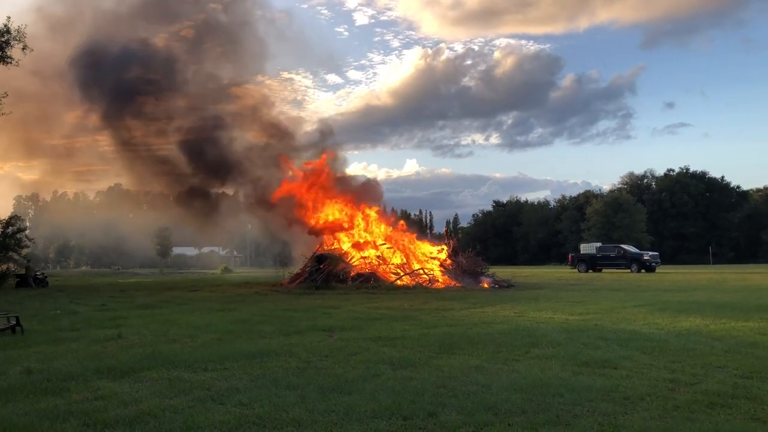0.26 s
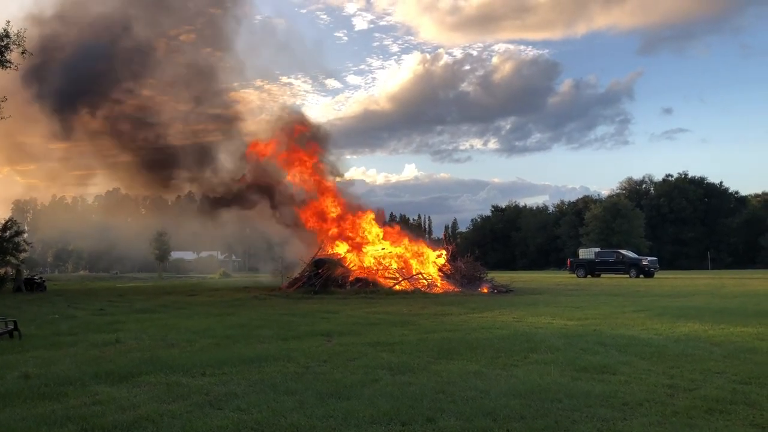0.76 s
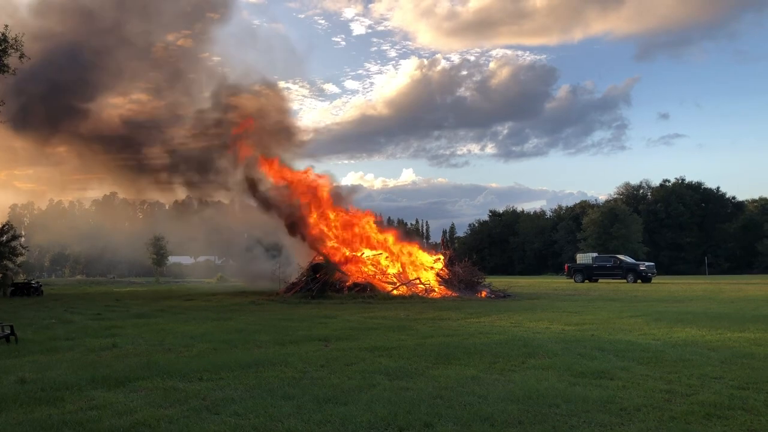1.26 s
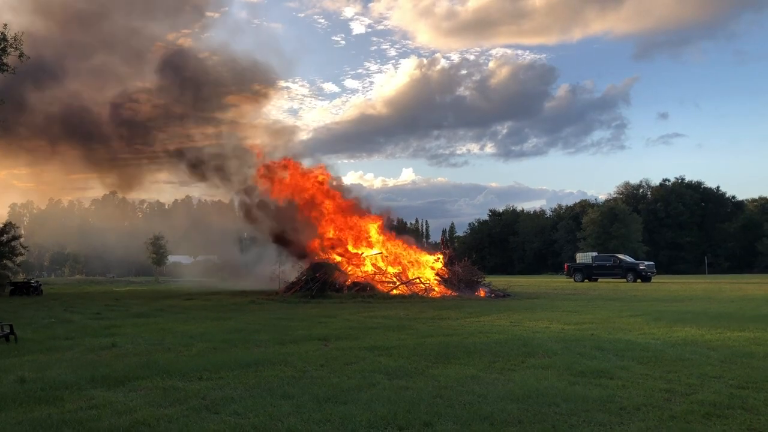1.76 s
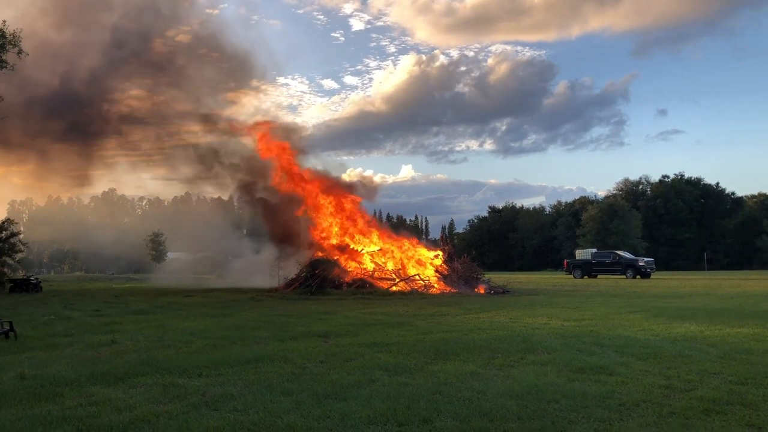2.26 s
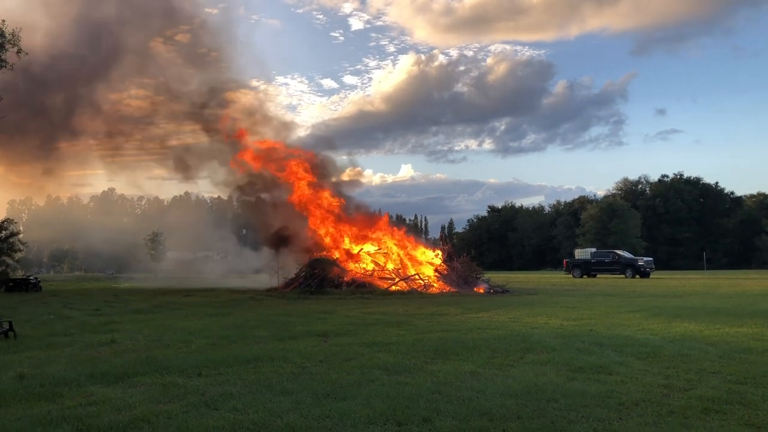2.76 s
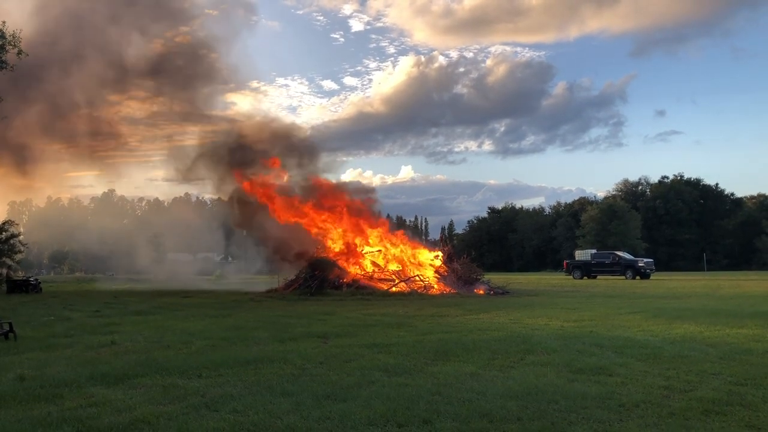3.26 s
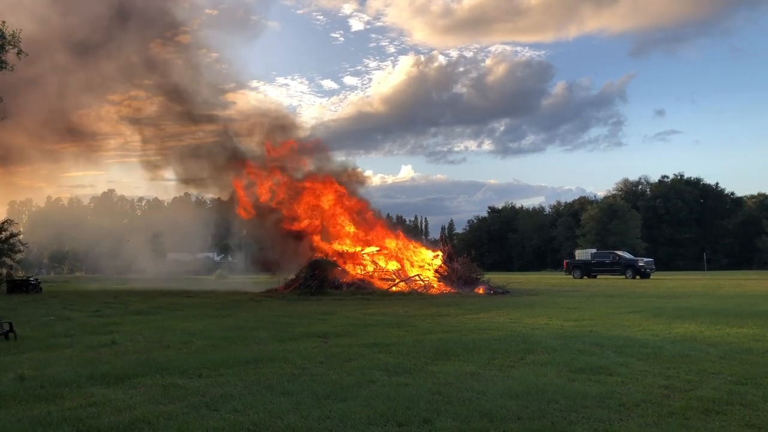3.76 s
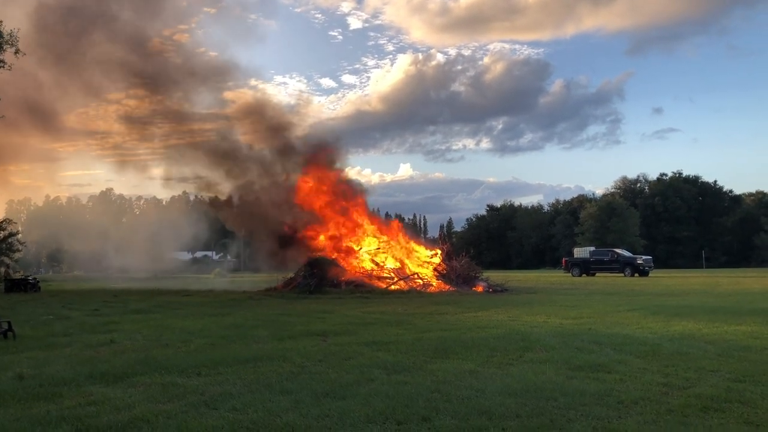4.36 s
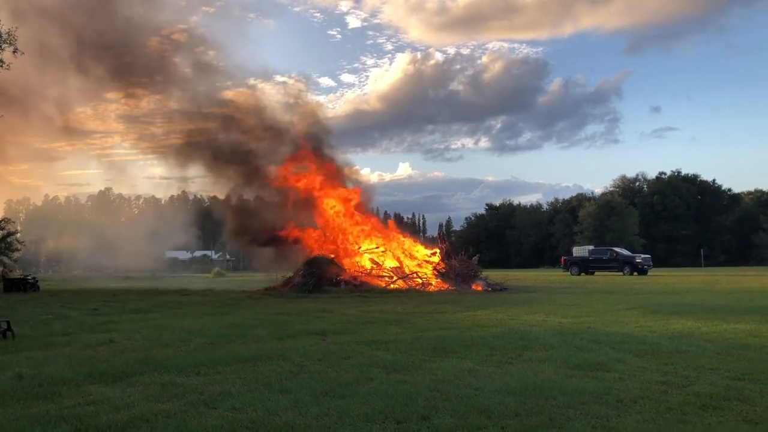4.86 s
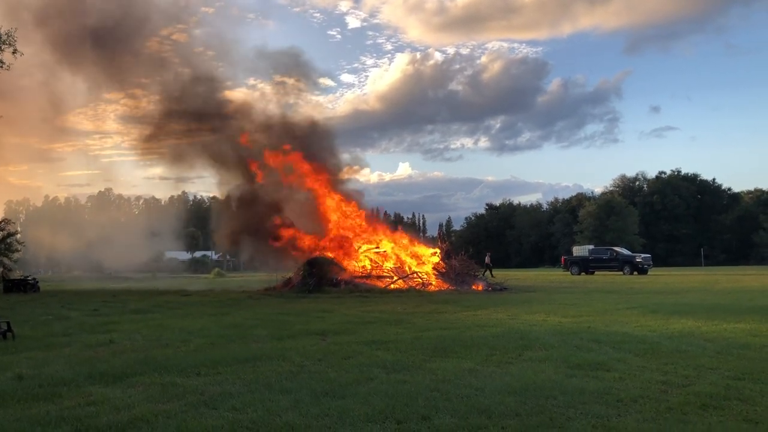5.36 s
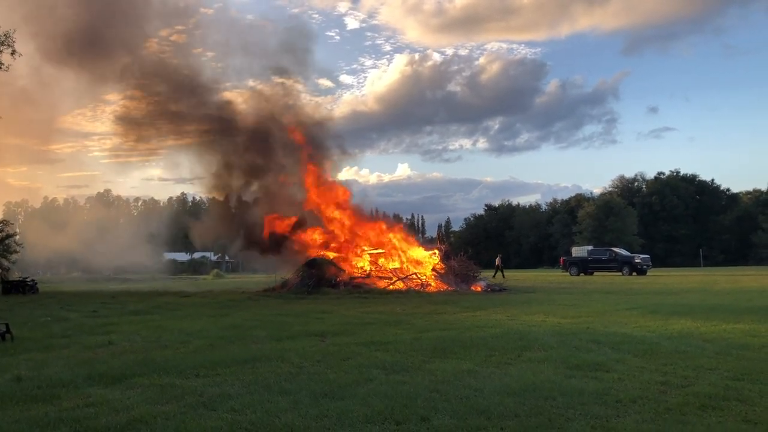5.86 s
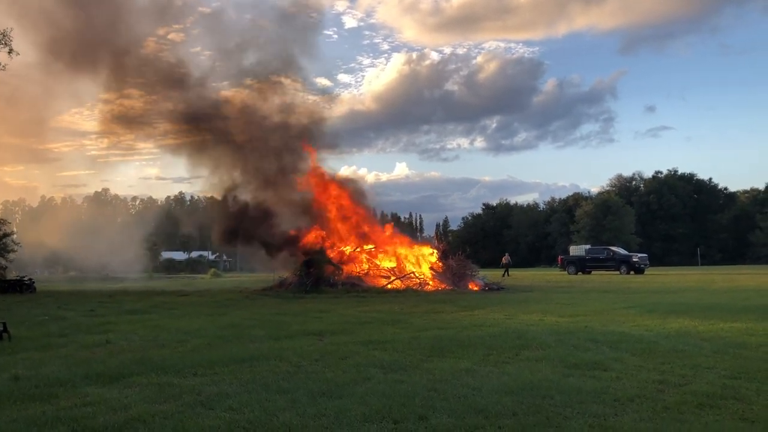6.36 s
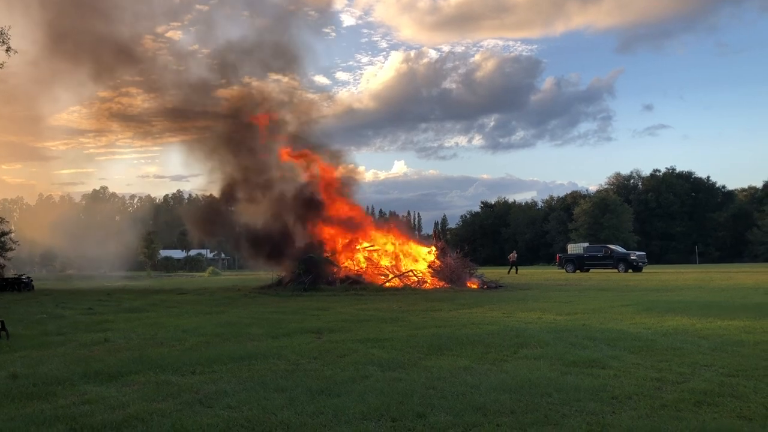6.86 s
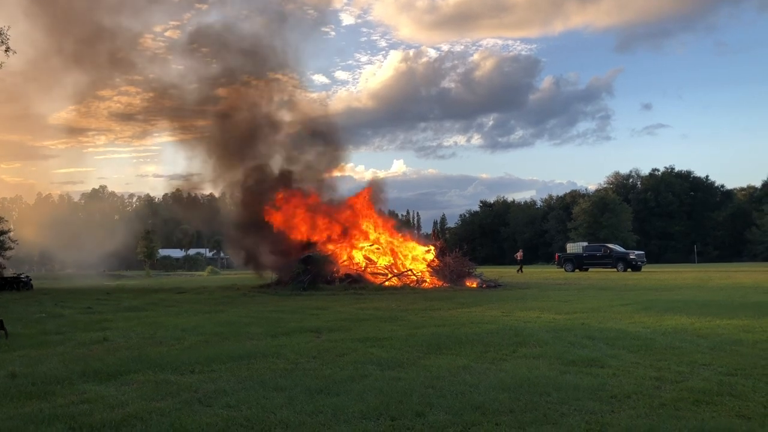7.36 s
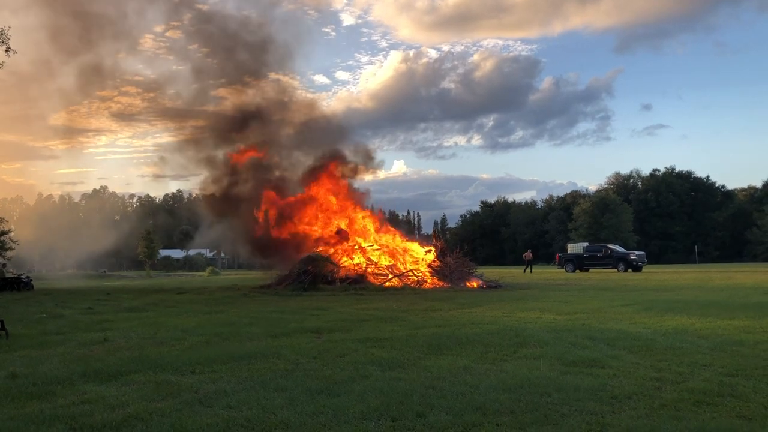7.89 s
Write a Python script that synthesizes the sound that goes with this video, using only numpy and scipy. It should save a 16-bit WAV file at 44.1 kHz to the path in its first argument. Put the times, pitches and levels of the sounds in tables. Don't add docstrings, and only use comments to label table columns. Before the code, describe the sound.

Continuous outdoor fire crackle: countless tiny ticks, medium dry snaps and occasional loud cracks, some dull and woody, others bright. Soft turbulent flame roar and low churning lie underneath, with the uneven bass throb of an idling truck, generator hum and a faint steady whine. A distant horn chord disappears at the start; far traffic drones, rising briefly around six seconds as a lorry passes. A loud crack comes at the very end. Phone microphone, open air, no close sounds.

```python
import sys
import numpy as np
from scipy import signal
from scipy.fft import rfft, irfft, next_fast_len
from scipy.io import wavfile
from scipy.ndimage import uniform_filter1d

SR = 44100
rng = np.random.default_rng(int(sys.argv[2]) if len(sys.argv) > 2 else 0)


def level_to_linear(level):
    exponent = np.asarray(level, float) / 20
    return 10 ** exponent


def store_pcm(level_fs):
    pcm = np.round(np.clip(level_fs, -1, 1) * 32767).astype(np.int16)
    wavfile.write(sys.argv[1], SR, np.atleast_2d(pcm).T)


N = 358533
TIME_S = np.arange(N) / SR

# start_s, draught_db, dry_fuel_db
BLAZE = [(0.0, -47, -49), (0.2, -45, -53.5), (0.93, -45, -56), (1.31, -48, -53), (1.83, -46.5, -56.5),
         (2.15, -50.5, -53.5), (2.42, -47, -56.5), (3.51, -48.5, -53), (4.2, -48, -57), (5.25, -49.5, -57),
         (6.0, -47.5, -53.5), (6.57, -51, -57.5), (6.77, -49, -56.5), (6.9, -45.5, -55), (7.27, -52.5, -56),
         (7.81, -45.5, -54.5), (8.13, -47.5, -59)]
# freq_hz, density_db_per_hz
ROAR_SPECTRUM = [(120, -4), (200, -3.5), (399, -8), (497, -12), (842, -8), (974, -12), (1400, -8),
                 (2060, -14.5), (2250, -15.5), (4920, -15), (6710, -22), (12900, -25), (15500, -28)]
# centre_hz, width_hz, level_db
CHURN = [
    (56.8, 25.5, -49.5),
    (95.7, 37, -47.5),
    (163.7, 26.4, -53),
]
# multiple, level_db
SHAFT_HUM = [(2, -51), (4, -58.5), (5, -47), (6, -57.5), (8, -65), (9, -61), (10, -66), (20, -71),
             (28, -67)]
# start_s, level_db
WHINE_LEVEL = [(0.0, -76), (0.12, -55), (0.64, -56.5), (0.74, -72), (0.86, -55), (1.54, -64), (2.2, -58.5),
               (2.95, -57.5), (3.2, -58.5), (3.96, -56), (4.3, -74), (4.6, -65), (5.55, -58), (6.15, -58.5),
               (6.9, -60), (7.45, -63), (7.8, -59), (8.13, -62)]
# start_s, turns_done, level_db
IDLE = [
    (0.0, 0.2, -42),
    (2.0, 21.82, -41.3),
    (3.5, 38.02, -42),
    (4.0, 43.33, -40.8),
    (5.2, 56.43, -40.2),
    (6.0, 64.94, -40.4),
    (7.0, 75.73, -41.6),
    (8.13, 88.28, -40.2),
]
# centre_hz, width_hz, level_db
EXHAUST_MODES = [
    (53, 7.1, -21),
    (91.7, 25.5, 2.5),
    (102.4, 9, 9),
    (153, 76, -16.5),
]
# freq_hz, level_db
HORN_CHORD = [
    (372, -78),
    (416, -56),
    (517, -61),
    (619, -68),
]
# freq_hz, gain_db
POP_PATH = [(1500, 6), (3000, 1), (5100, 0.5), (6800, -4), (9700, -6), (13000, -3), (15500, -4.5)]
# start_s, level_db
BARK_TICKS = [(.0074, -41), (.1564, -43), (.1906, -41), (.704, -41), (.771, -44), (1.104, -40),
              (1.3804, -46), (1.5125, -41), (1.609, -41), (3.4654, -45), (4.1077, -39), (5.1734, -38),
              (5.4165, -44), (6.204, -40), (6.905, -40.5), (7.0044, -40), (7.1074, -43), (7.9312, -38)]
# start_s, level_db
NEEDLE_TICKS = [(.2154, -44), (.922, -43), (1.813, -39), (1.944, -43), (2.437, -45), (3.3884, -44),
                (3.5564, -43), (4.312, -48), (4.547, -45), (4.803, -43), (4.957, -39), (5.484, -39),
                (6.171, -48), (6.334, -48), (6.587, -48), (7.47, -46), (7.849, -46), (8.031, -35)]
# start_s, level_db, ring_hz
DAMP_SNAPS = [(0.136, -39, 4690), (0.255, -33, 3490), (0.304, -37, 5210), (0.4066, -34.5, 1520),
              (0.9296, -38, 1460), (.9737, -36.5, 5070), (1.081, -38, 4880), (1.154, -38, 1760),
              (1.3479, -36.5, 2670), (1.469, -36, 1453), (1.634, -42, 4620), (2.213, -36.5, 3446),
              (2.6412, -32.5, 3800), (2.7675, -37.5, 3020), (3.415, -37.5, 2715), (3.9763, -34.5, 2590),
              (4.023, -37, 4610), (4.1236, -35, 1700), (4.8718, -39.5, 4690), (5.269, -36, 4390),
              (5.3126, -38, 2580), (5.3736, -38, 3360), (5.454, -34.5, 4780), (6.54, -39.5, 3734),
              (6.747, -38, 3370), (6.843, -39, 2115), (7.0823, -40, 3620), (7.524, -38.5, 3620),
              (7.64, -36, 6040), (7.7741, -43, 3330)]
# start_s, level_db, ring_hz
DRY_SNAPS = [(0.198, -32.5, 2770), (.4331, -38, 4260), (0.8382, -36, 3500), (0.9823, -36.5, 4390),
             (1.183, -34.5, 4880), (1.438, -36.5, 4950), (2.0303, -38.5, 4010), (2.14, -41, 6290),
             (2.199, -34, 4740), (2.245, -38.5, 5340), (2.609, -37, 5380), (2.748, -34.5, 4000),
             (2.91, -42, 6240), (3.026, -38, 3880), (3.306, -41, 4350), (3.3786, -40, 5380),
             (3.582, -33, 4480), (3.595, -36, 4598), (4.771, -36, 4480), (5.1048, -40, 3500),
             (5.536, -39.5, 2973), (5.65, -34, 5570), (5.8305, -36, 2020), (5.970, -38, 4060),
             (6.0514, -42, 5470), (7.0692, -39, 5803), (7.242, -41, 4030), (7.363, -38, 5080),
             (2.916, -43, 7500), (3.096, -46, 5000), (0.228, -44, 6000), (1.899, -37, 3400),
             (7.02, -44, 6500)]
# start_s, level_db, ring_hz, treble_db
FAINT_SNAPS = [(0.577, -41, 2630, -12), (1.302, -40, 4420, 2), (1.484, -40, 5530, -2),
               (1.5552, -39, 3620, -18), (1.8327, -43, 1673, -18), (1.981, -38.5, 5000, 3),
               (2.083, -39.5, 4450, -11), (2.367, -39.5, 3080, -21), (2.9661, -41, 5010, 9),
               (3.2907, -37.5, 4870, 2), (3.8347, -40, 5030, 1), (3.929, -40, 4260, -9),
               (4.199, -38, 4520, -1), (4.2777, -38, 3960, -7), (4.335, -38.5, 4970, -22),
               (4.519, -40, 4480, -4), (4.5689, -42, 4800, 0), (4.6098, -40.5, 5470, -7),
               (4.6758, -42, 4336, 3), (5.07, -40, 4200, 8), (5.2225, -40.5, 4380, -19),
               (5.3616, -39, 3700, 14), (5.5484, -40.5, 3570, -16), (5.9172, -41, 5450, 11),
               (6.3747, -39.5, 3520, -21), (6.6, -42, 3750, -25), (6.9197, -37, 3300, -14),
               (7.0467, -40.5, 3444, -19), (7.427, -41.5, 3430, -20), (7.497, -39, 5730, -7),
               (0.8629, -47, 1850.0, 1), (0.9565, -37, 1590.0, -21), (1.1557, -40, 1640.0, -20),
               (1.1997, -43, 1640.0, 7), (1.6257, -41, 2540.0, -12), (1.6655, -41, 1810.0, -1),
               (1.833, -44, 1420.0, -11), (1.9161, -34, 4650.0, -14), (2.009, -43, 6890.0, 3),
               (2.0627, -49, 5250.0, 8), (2.1485, -44, 3750.0, 10), (2.1795, -41, 5600.0, 12),
               (2.223, -37, 3270.0, 1), (2.2845, -37, 6030.0, 3), (2.3156, -40, 1640.0, 3),
               (2.7911, -42, 3616, -18), (2.85, -43, 5040.0, -7), (2.9294, -47, 2450.0, -5),
               (3.019, -37, 4780.0, -8), (3.188, -45, 4480.0, 2), (3.4097, -43, 2200.0, -12),
               (3.5643, -48, 1592, -13), (3.706, -41, 1590.0, 9), (3.8477, -46, 4786, -11),
               (4.0035, -40, 2370.0, -11), (4.3726, -43, 5127, 7), (4.4982, -42, 6680.0, 9),
               (4.7207, -43, 3660.0, -16), (4.8978, -41.5, 5640.0, -4), (5.1047, -42, 1550.0, 9),
               (5.2606, -45, 3750.0, 0), (5.3463, -43, 2800.0, 7), (5.672, -32, 4150, -8),
               (5.6436, -39, 4910.0, 1), (5.8262, -38, 1120.0, 8), (6.093, -40, 3750.0, 2),
               (6.2303, -42, 2710.0, -13), (6.831, -45, 4790, -16), (7.0962, -41, 6956, -6),
               (7.241, -41, 3570.0, -2), (7.317, -45, 5300.0, -9), (7.3936, -47, 3230.0, -12),
               (7.4535, -39, 1640.0, -18), (7.676, -41, 2280.0, -14), (7.7832, -42, 1381, 4)]
# start_s, level_db, low_hz, treble_db, scatter_db
STICK_POPS = [(0.2647, -15, 2480, -8, -25), (0.3384, -24.5, 2300, -4, -22), (0.6395, -23.5, 3760, -6, -20),
              (.6949, -34.5, 2627, 5, -16), (.8989, -32.5, 2070, -23, -17), (1.5245, -29, 1150, -6, -13),
              (1.6421, -29, 2262, -5, -11.5), (2.404, -29, 1900, -4, -14), (2.652, -29, 2500, -12, -12),
              (2.995, -27.5, 2210, -17, -28), (3.2064, -35.5, 1409, -28, -11),
              (3.5857, -22, 2940, -30, -20.5), (4.1635, -29, 3190, -15, -21),
              (4.4419, -34.5, 3790, -2, -11), (4.462, -30.5, 1680, -14, -24),
              (4.6336, -27.5, 960, -16, -30), (5.716, -32.5, 1770, -1, -18),
              (5.8454, -30, 3700, -13, -18.5), (6.0066, -29.5, 2040, -4, -15),
              (6.13, -33.5, 1410, -19, -30), (6.4057, -28.5, 2540, -14, -17.5),
              (6.9436, -27.5, 2840, -13, -18), (8.047, -32, 1858, 5, -17), (8.0601, -30, 1680, 0, -21)]
# start_s, level_db, low_hz, high_hz, treble_db
BRANCH_POPS = [(.372, -28, 1850, 4700, -39), (0.5018, -25.5, 1310, 4460, -44),
               (0.5494, -29.5, 1140, 4780, -9), (0.9538, -31.5, 930, 2240, -32),
               (1.5288, -39, 3020, 4630, -25), (1.9122, -32, 1640, 6930, -11),
               (2.3792, -35, 1284, 3890, -28), (2.5745, -23, 1140, 3903, -9),
               (3.1552, -31.5, 1640, 4600, -9), (3.698, -35, 1210, 6660, -19),
               (3.8107, -29, 1490, 5200, -35), (4.9512, -33.5, 2413, 4940, -8),
               (5.389, -27, 1664, 3560, -8), (5.7769, -34, 2200, 6800, -9), (6.257, -37, 1770, 5270, -8),
               (6.4797, -32.5, 3100, 7500, -3), (7.2543, -35.5, 2590, 6760, -22),
               (7.3225, -35, 1120, 3740, -12), (7.597, -38, 1341, 5000, -21),
               (7.6497, -32, 1565, 5280, -10), (7.792, -28.5, 1270, 4430, -16),
               (7.878, -34, 3454, 6760, -18)]
# start_s, level_db, low_hz, treble_db, scatter_db
TWIG_POPS = [(1.0548, -31, 3480, 4, -11.5), (1.8832, -28.5, 2760, -13, -22), (1.8935, -34, 3900, 1, -13),
             (2.2919, -29, 3660, 4, -17), (3.337, -35, 3490, 3, -9), (3.8916, -35, 3490, -4, -11),
             (4.1525, -24.5, 3920, 0, -19.5), (4.483, -37.5, 3957, -7, -10), (4.845, -30, 3990, 7, -21),
             (5.1625, -26, 2327, 7, -20), (5.3244, -27, 3490, -3, -19.5), (5.6257, -24, 4084, -6, -21),
             (5.6632, -25, 4610, -18, -21), (5.7441, -19.5, 4300, 1, -27), (6.1047, -34, 2314, 2, -22),
             (6.1366, -29.5, 4780, 2, -14), (6.441, -33, 1890, -2, -21), (6.8164, -35.5, 2580, -5, -16),
             (6.9646, -36, 3400, 2, -14), (7.74, -32.5, 2236, -3, -26), (7.864, -24.5, 3676, 9, -32),
             (7.938, -24.5, 3380, -6, -22), (7.9792, -32, 3560, -14, -23), (8.071, -15, 2340, 2, -24)]
# start_s, low_ring_hz, low_lift_db, high_ring_hz, high_lift_db
SPLINTER_RINGS = [(0.2647, 2160, 5, 4000, 7), (0.3384, 2100, 8, 5040, 6), (0.372, 2200, 14, 5000, 6),
                  (0.5022, 1470, 12, 3790, 5), (0.5494, 1250, 9.5, 4290, 7), (0.6395, 3000, 6, 4500, 10),
                  (0.9533, 1290, 3, 4410, 20), (1.0548, 4910, 3, 5840, 3), (1.5245, 1490, 5, 3560, 20),
                  (1.6421, 2520, 4, 3250, 2), (1.8832, 5470, 3, 7200, 6), (2.2919, 5530, -1, 8160, -5),
                  (2.404, 3540, 13, 5490, 9), (2.5742, 2260, 16, 3640, 12), (2.652, 4030, 2, 5400, 12),
                  (2.995, 2370, 11, 5000, 7.5), (3.1543, 2822, 7, 3490, 6), (3.5857, 4430, 7.5, 5880, -3),
                  (3.8106, 1530, 8, 4590, 10), (4.1525, 5340, 4, 9000, 3), (4.462, 1310, 3, 2260, 7),
                  (4.6336, 1100, 9, 4420, 12.5), (4.845, 5905, 3, 8500, 3), (5.1625, 2280, 11.5, 5140, 11),
                  (5.3244, 3680, 2, 5470, 2), (5.389, 2160, 9, 4370, 3), (5.6257, 4810, 1, 8200, 3),
                  (5.6632, 4917, 1, 5555, 2), (5.7441, 5530, 6, 7710, -4), (5.8454, 4740, 4, 5600, 0),
                  (6.0066, 3470, 10, 5430, -12), (6.1366, 5540, 6, 7970, 6), (6.4057, 2650, 7, 5040, 6),
                  (6.9436, 3380, 2, 5570, 4), (7.6495, 3600, 9, 5168, 5), (7.792, 1530, -1, 3120, 7),
                  (7.864, 4310, 9, 7970, 1), (7.938, 1398, 17.5, 5310, 8.5), (8.047, 3603, 10, 4800, 13),
                  (8.071, 2950, 8, 7800, 8)]
# start_s, ring_hz, lift_db
BODY_KNOCKS = [(.2647, 8600, 3), (.3384, 8150, 5), (.9533, 895, 11), (1.5245, 1000, 6), (2.404, 1590, 8),
               (2.5742, 1090, 10.5), (2.5742, 800, 12), (3.5857, 1670, 10), (4.1525, 6760, 3),
               (4.6336, 805, 5), (5.6257, 6730, 5), (7.938, 10300, 3), (8.071, 5490, 4), (8.071, 4640, 5),
               (8.071, 1560, 9), (8.071, 10700, 5.5), (8.071, 15020, 0), (.2647, 12500, 3),
               (.6395, 11900, 7), (.5494, 8160, 8), (5.389, 1700, 5)]


def level(x, db):
    return x * level_to_linear(db) / np.sqrt(np.mean(x ** 2))


def curves(table):
    start_s, *columns = np.transpose(table)
    return [np.interp(TIME_S, start_s, column) for column in columns]


def walk(rate_hz):
    hold = int(SR / rate_hz)
    steps = np.repeat(rng.standard_normal(N // hold + 1), hold)
    return 1.09 * uniform_filter1d(uniform_filter1d(steps, hold), hold)[:N]


def band(x, hz, width_hz):
    return signal.lfilter(*signal.iirpeak(hz, hz / width_hz, fs=SR), x)


def rumble(hz, width_hz):
    return band(band(rng.standard_normal(N), hz, width_hz), hz, width_hz)


def flames():
    roar_db, hiss_db = curves(BLAZE)
    hz_points, db_points = np.transpose(ROAR_SPECTRUM)
    size = next_fast_len(N)
    f = np.fft.rfftfreq(size, 1 / SR) + 1
    colour = level_to_linear(np.interp(np.log(f), np.log(hz_points), db_points))
    colour = colour / np.sqrt(np.sum(colour[(f > 500) & (f < 6000)] ** 2) / len(f))
    swell_db = 0.5 * roar_db + 0.5 * roar_db.mean()
    sizzle_db = hiss_db - hiss_db.mean() + roar_db.mean()
    flicker = walk(70)
    out = 0
    for octave in np.arange(7, 14.5, 0.5):
        share = np.cos(np.pi * np.clip(np.log2(f) - octave, -0.5, 0.5))
        noise = irfft(rfft(rng.standard_normal(N), size) * colour * share)[:N]
        bright = np.clip((octave - 10.5) / 3.2, 0, 1)
        treble_db = bright * (sizzle_db - swell_db + 2.0 * flicker)
        out = out + noise * level_to_linear(swell_db + treble_db + 1.6 * walk(12) - 2.0)
    return out + sum(level(rumble(hz, width_hz), db) for hz, width_hz, db in CHURN)


def generator():
    teeth, whine_hz, creep_hz_per_s = 64, 1927, 1.5
    whine_db, = curves(WHINE_LEVEL)
    shaft_hz = (whine_hz + creep_hz_per_s * TIME_S + 3.6 * walk(4)) / teeth
    turn = 2 * np.pi * np.cumsum(shaft_hz) / SR
    hum = sum(level_to_linear(db + 1.6 * walk(9)) * np.sin(int(round(k)) * turn + 7 * rng.random())
              for k, db in SHAFT_HUM)
    whine = level_to_linear(whine_db - 1.5 + 2 * walk(20)) * np.sin(teeth * turn + 0.7 * walk(30))
    return np.sqrt(2) * (hum + whine)


def truck(rough=0.033, scatter_db=0.0):
    turns, db = curves(IDLE)
    firing = (4 * (turns + 0.2)).astype(int)
    at = np.flatnonzero(np.diff(firing))
    jitter, uneven = rng.standard_normal((len(at), 2)).T
    pattern_db = np.array([14.0, -29, -13, -32])[firing[at + 1] % 4]
    where = np.clip(at + rough * SR / 43 * jitter, 0, N - 1).astype(int)
    pulses = np.bincount(where, level_to_linear(pattern_db + scatter_db * uneven), N)
    pipe = sum(level_to_linear(gain_db) * band(band(pulses, hz, width_hz), hz, 2 * width_hz)
               for hz, width_hz, gain_db in EXHAUST_MODES)
    return level(pipe, -0.46) * level_to_linear(db)


def road():
    lorry_s, rise_s, fall_s, lorry_db = 5.75, 0.53, 0.99, 9.5
    late_s = TIME_S - lorry_s
    swell_db = lorry_db * np.exp(-np.abs(late_s) / np.where(late_s < 0, rise_s, fall_s))
    return level(rumble(400, 79), -4.0) * level_to_linear(-60.5 + swell_db)


def horn():
    end_s, fade_s = 0.39, 0.21
    late = np.maximum(TIME_S - end_s, 0) / fade_s
    out = 0
    for hz, db in HORN_CHORD:
        fade = np.exp(-late * (hz / 416) ** 4)
        out = out + np.sqrt(2) * level_to_linear(db + 1.9 * walk(11)) * fade * np.sin(2 * np.pi * hz * TIME_S)
    return out


def pop_colour(f, low_hz, high_hz, treble_db):
    ring = 1 / np.sqrt((1 + (low_hz / 0.89 / f) ** 5) * (1 + (f / high_hz / 1.137) ** 8))
    hollow = np.exp(-(np.log(f / np.sqrt(low_hz * high_hz)) / 0.67) ** 2)
    hollow = hollow * np.clip(np.log(high_hz / low_hz) - 0.8, 0, 1)
    ripple_db = 6.3 * np.sin(f / 620 + 7 * rng.random(low_hz.shape))
    treble = level_to_linear(treble_db - 1.5) / (1 + (7500 / f) ** 6) * level_to_linear(ripple_db)
    path_hz, path_db = np.transpose(POP_PATH)
    return (ring * level_to_linear(-13 * hollow) + treble) * level_to_linear(np.interp(np.log(f), np.log(path_hz), path_db))


def pops(rows, crack_s, tail_s, size=1536, count=192, rings=(), order=32):
    start_s, db, low_hz, high_hz, treble_db, tail_db = (c[:, None] for c in np.transpose(rows))
    f = np.fft.rfftfreq(size, 1 / SR) + 1
    t = (np.arange(size) - count) / SR + 0.00033
    after = np.maximum(t, 0)
    plain = pop_colour(f, low_hz, high_hz, treble_db)
    colour = plain + 0j
    for at_s, *pairs in rings:
        nearest = np.argmin(np.abs(start_s - at_s))
        for hz, lift_db in np.reshape(pairs, (-1, 2)):
            colour[nearest] *= 1 + (level_to_linear(lift_db) - 1) / (1 + 8j * (f / hz - hz / f))
    crack_noise, tail_noise, lump_noise = rng.standard_normal((3, len(rows), size))
    split = after / (crack_s * (4000 / low_hz) ** 0.26)
    fall = (np.exp(-split) + 0.1 * np.exp(-split / 4)) * np.minimum(after / 0.0003, 1)
    crack = rfft(crack_noise * fall)
    evenness = np.sqrt(uniform_filter1d(np.abs(crack) ** 2, size // order))
    crack = irfft(colour * crack / evenness, size)
    crack = crack * np.exp(np.minimum(t, 0) / 0.00053)
    crack = crack / np.sqrt(np.sum(crack ** 2, axis=1, keepdims=True) / 96)
    lumps = level_to_linear(4.2 * 5.1 * uniform_filter1d(lump_noise, size=36))
    tail_colour = np.sqrt(plain * np.abs(colour)) / np.sqrt(1 + (f / 9000) ** 2)
    tail = irfft(tail_colour * rfft(tail_noise), size) * lumps
    tail = tail / tail.std(axis=1, keepdims=True)
    creak = level_to_linear(-21) * np.exp(np.minimum(t, 0) / 0.002) * (t < 0)
    scatter = level_to_linear(np.maximum(tail_db, -29) + 11.5) * np.exp(-after / tail_s) * np.minimum(after / 0.0013, 1)
    burst = level_to_linear(db) * (crack + tail * (creak + scatter))
    where = (start_s * SR).astype(int) + np.arange(size)
    return np.bincount(where.ravel(), burst.ravel(), N + size)[count:N + count]


def crackle(count, db, spread_db, treble_db=-18, tail_db=-18):
    moment, bigness, pitch, brightness = rng.random((count, 4)).T
    swarm = np.cumsum(level_to_linear(2.5 * walk(6) + curves(BLAZE)[1]))
    start_s = np.searchsorted(swarm, moment * swarm[-1]) / SR
    ring_hz = 1400 * 8.3 ** pitch
    level_db = db + np.minimum(-spread_db * np.log(1 - bigness), 6)
    rows = [start_s, level_db, ring_hz / 2.2, ring_hz * 0.91, treble_db + 18 * brightness, tail_db + 0 * start_s]
    return pops(np.transpose(rows), crack_s=0.0013, tail_s=0.0034, size=768)


def pinpricks():
    rows = []
    for table, ring_hz, treble_db in ((BARK_TICKS, 4300, -8), (NEEDLE_TICKS, 6500, 6)):
        rows += [(s, db, ring_hz / 1.2, ring_hz * 0.96, treble_db, -26) for s, db in table]
    return pops(rows, crack_s=0.00062, tail_s=0.004, size=768)


def snaps():
    table = [(*row, -14.5) for row in DAMP_SNAPS] + [(*row, 1) for row in DRY_SNAPS]
    table = table + FAINT_SNAPS
    rows = [(s, db, hz / 1.54, hz * 1.4, treble_db, -19) for s, db, hz, treble_db in table]
    return pops(rows, crack_s=0.001, tail_s=0.013, size=1024)


def cracks():
    rows = [(*row, -18.5) for row in BRANCH_POPS]
    for table, top_hz in ((STICK_POPS, 6030), (TWIG_POPS, 7800)):
        rows += [(s, db, low_hz, top_hz, treble_db, tail_db) for s, db, low_hz, treble_db, tail_db in table]
    return pops(rows, crack_s=0.00052, tail_s=0.0084, rings=SPLINTER_RINGS + BODY_KNOCKS, order=128)


def scene():
    fire = flames() + crackle(count=1900, db=-51.5, spread_db=2.5)
    fire = fire + crackle(count=350, db=-58, spread_db=-0.5, treble_db=-5, tail_db=-34)
    fire = fire + pinpricks() + snaps() + cracks()
    return (fire + generator() + truck() + road() + horn())[None]


def roll_off(x):
    return signal.sosfilt(signal.butter(12, 15750, fs=SR, output="sos"), x)


def record(dry):
    bass_cut = signal.butter(3, 38, "high", fs=SR, output="sos")
    top_cut = signal.ellip(8, 0.3, 50, 15750, fs=SR, output="sos")
    mix = signal.sosfilt(np.vstack([bass_cut, top_cut]), dry)
    return roll_off(mix)


dry = scene()
out = record(dry)
store_pcm(out)
```